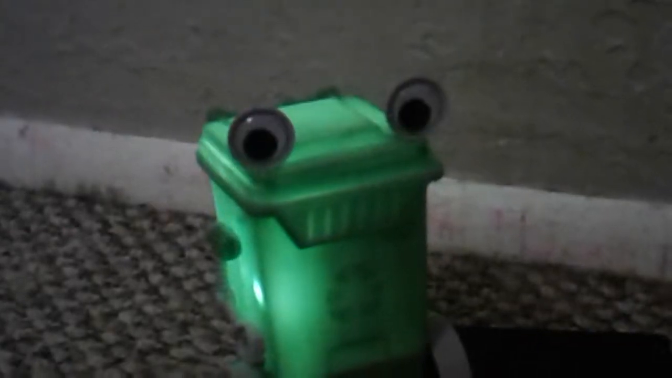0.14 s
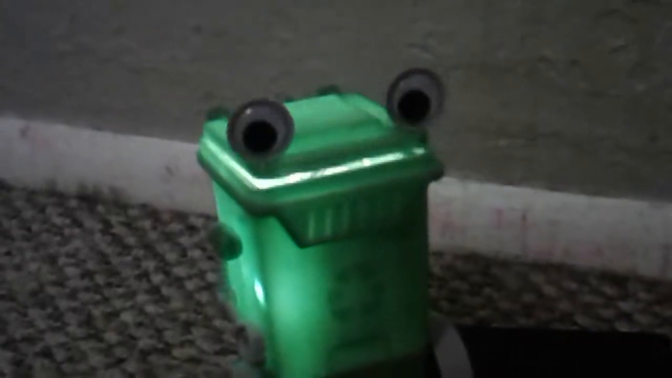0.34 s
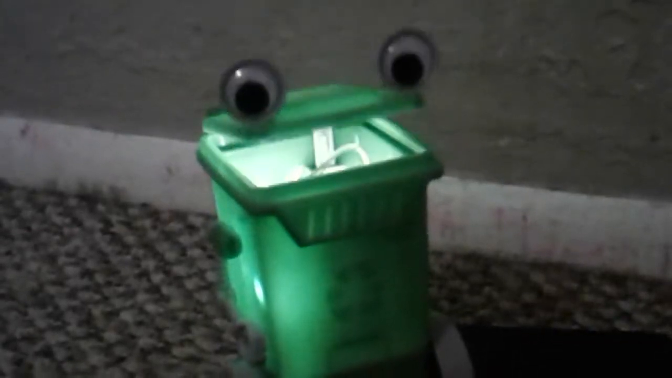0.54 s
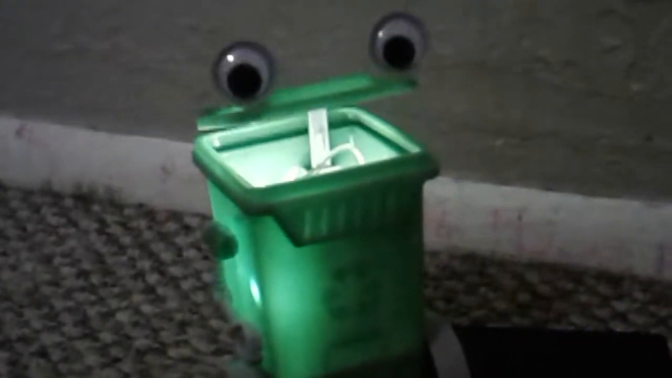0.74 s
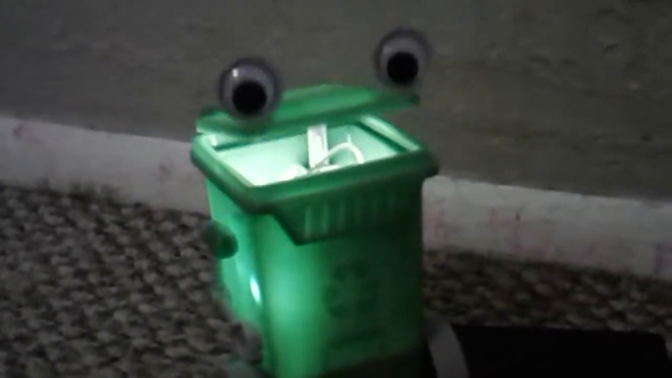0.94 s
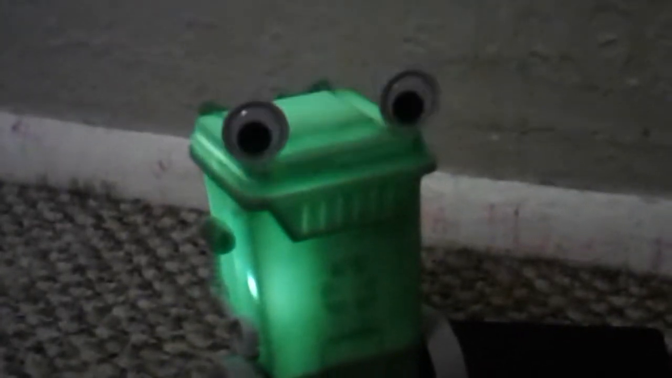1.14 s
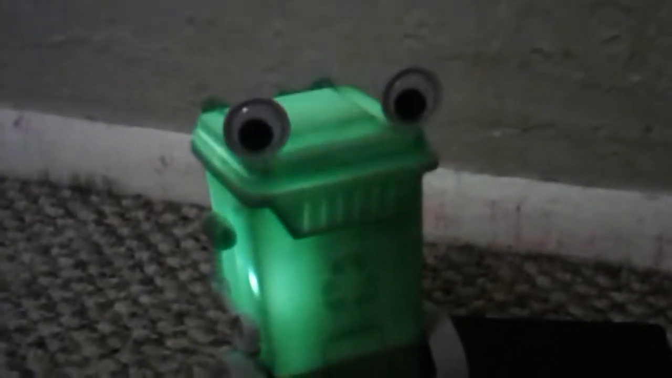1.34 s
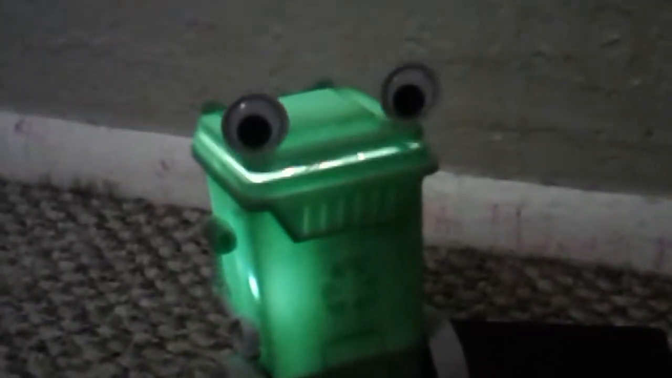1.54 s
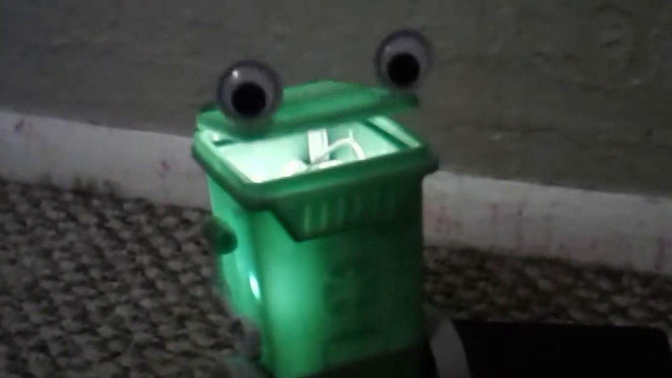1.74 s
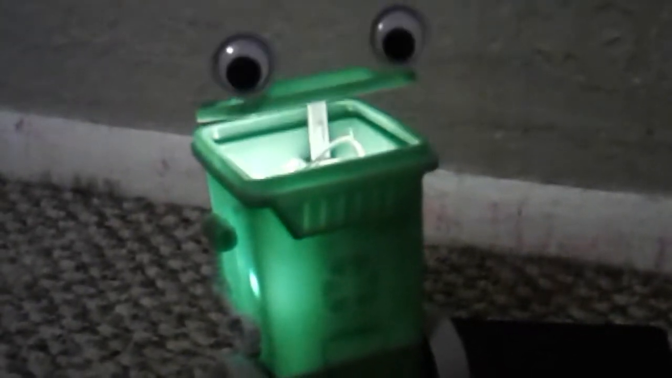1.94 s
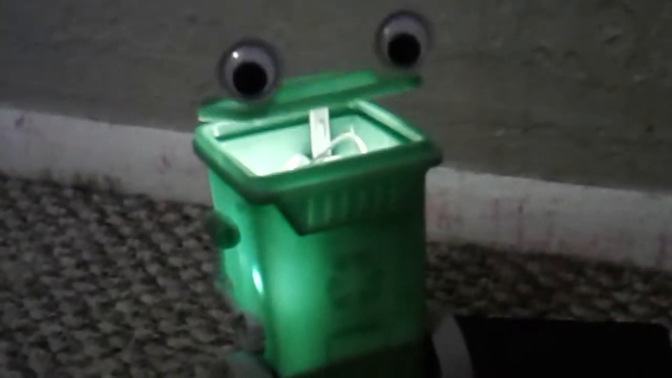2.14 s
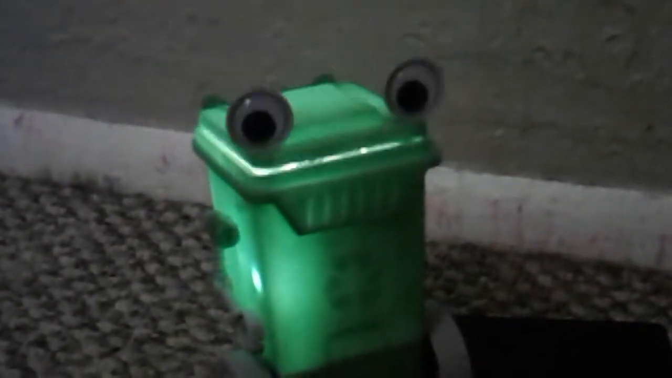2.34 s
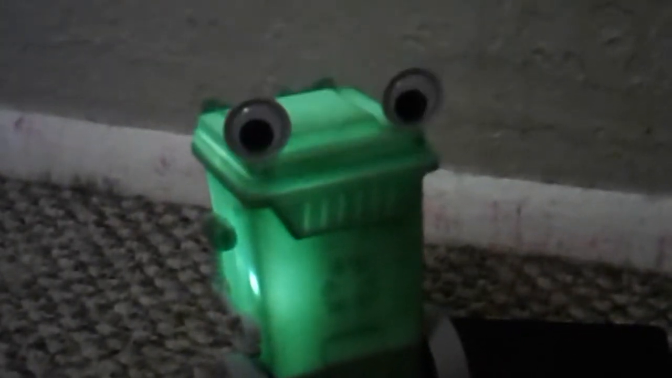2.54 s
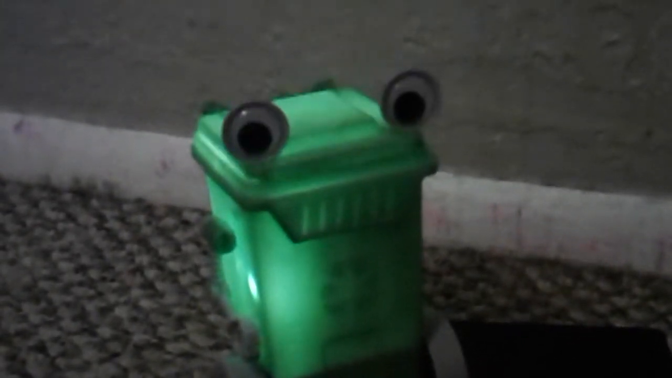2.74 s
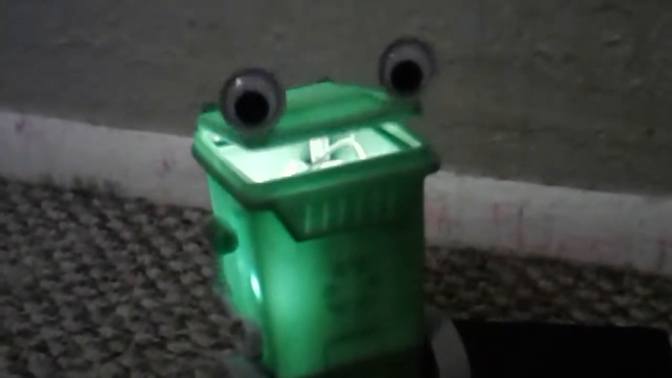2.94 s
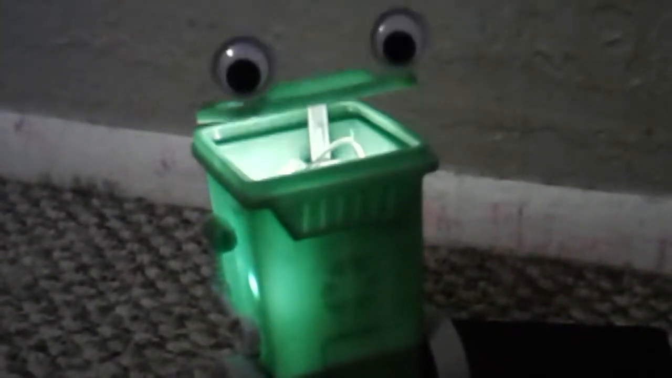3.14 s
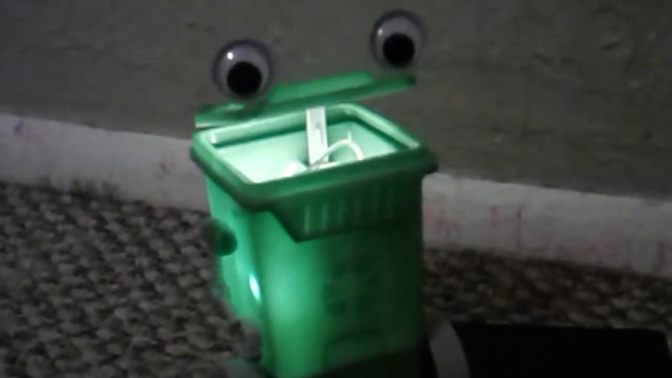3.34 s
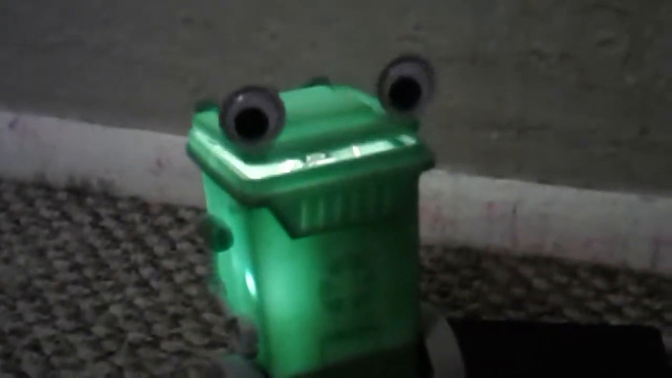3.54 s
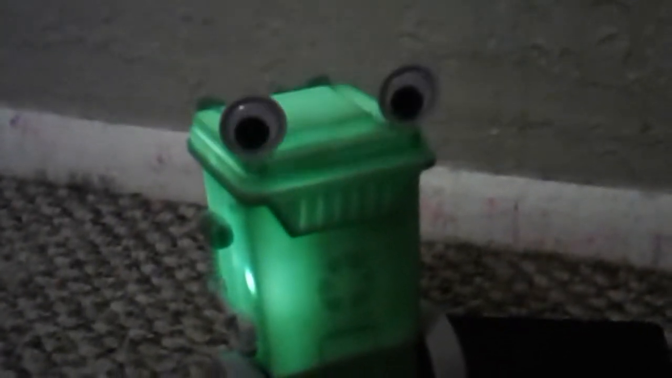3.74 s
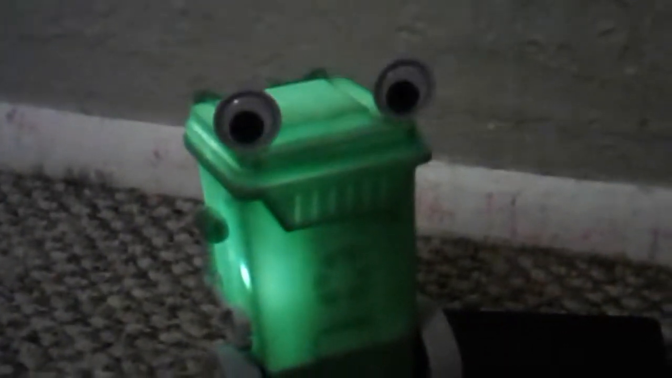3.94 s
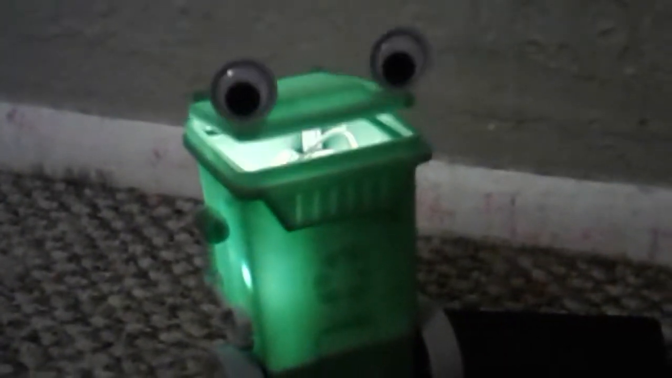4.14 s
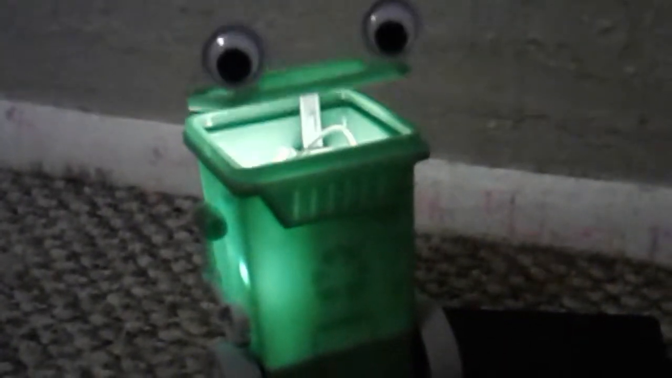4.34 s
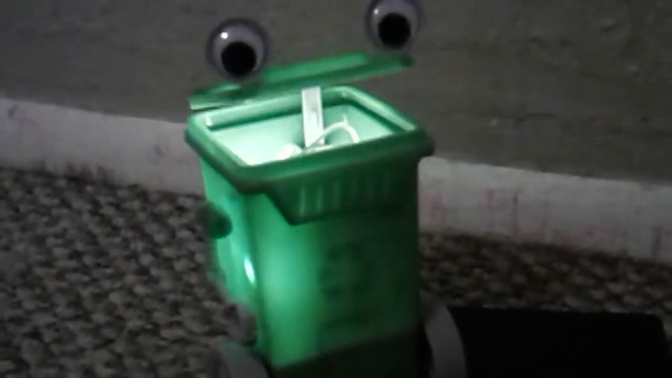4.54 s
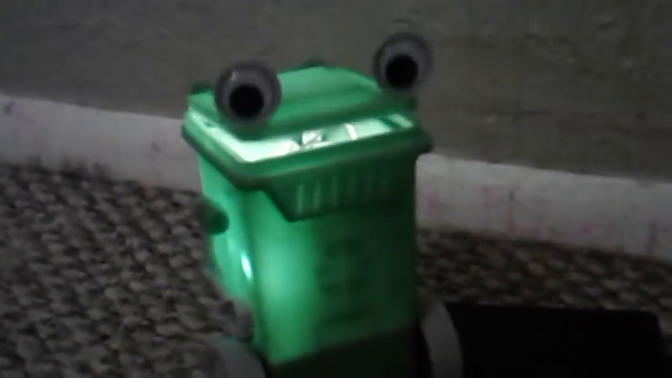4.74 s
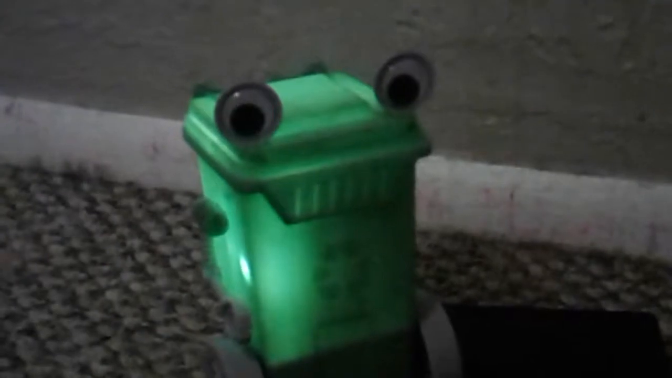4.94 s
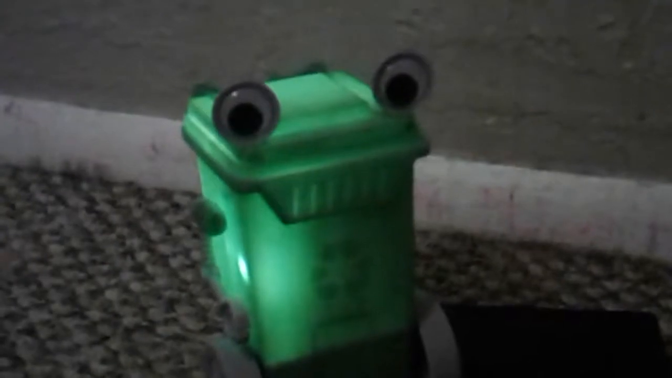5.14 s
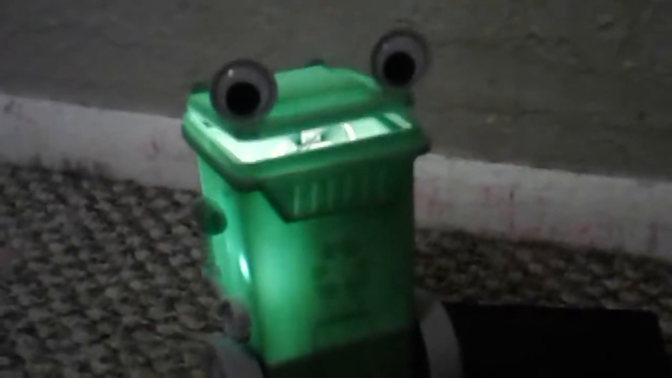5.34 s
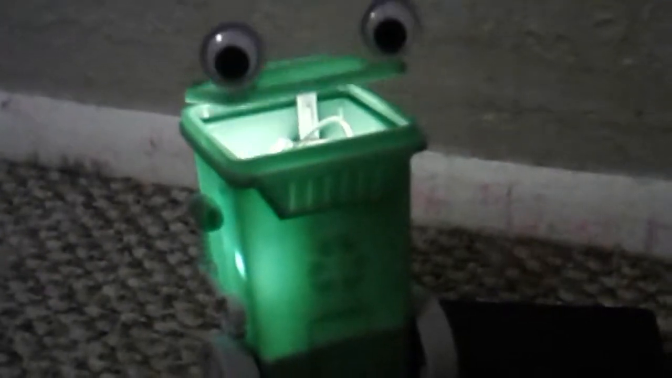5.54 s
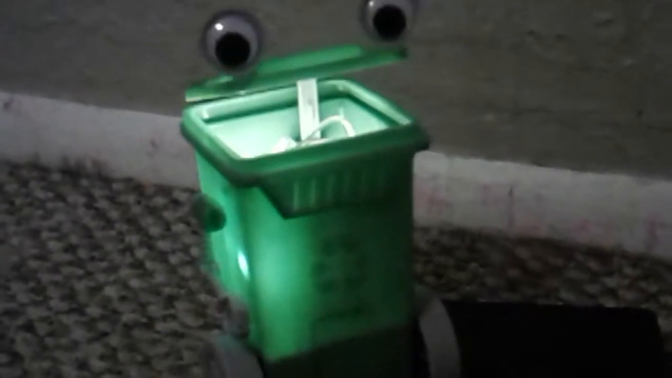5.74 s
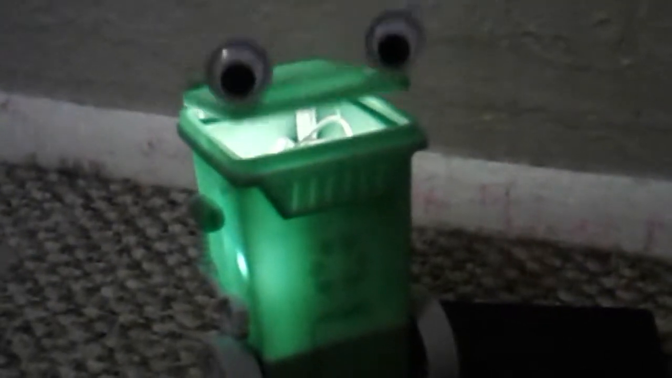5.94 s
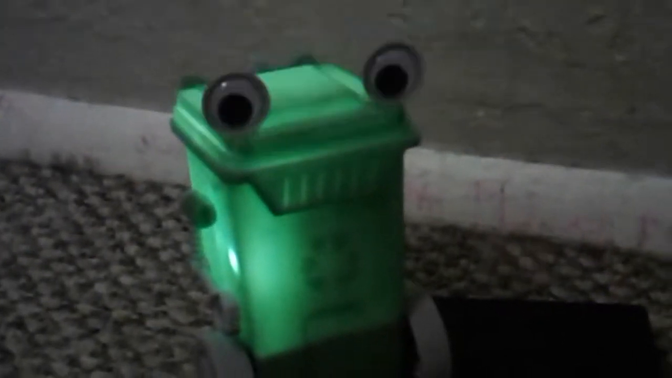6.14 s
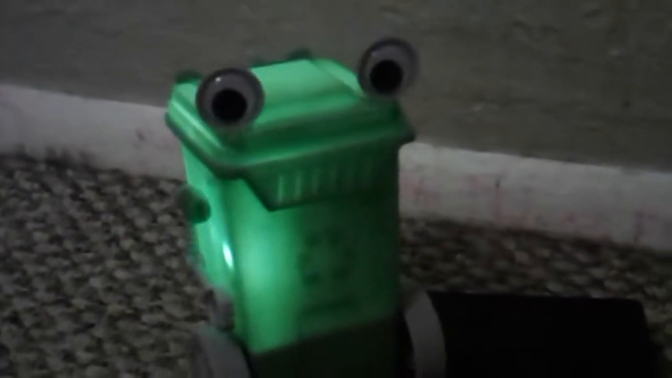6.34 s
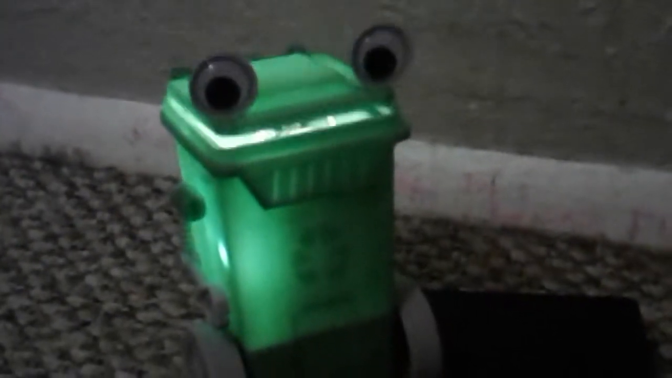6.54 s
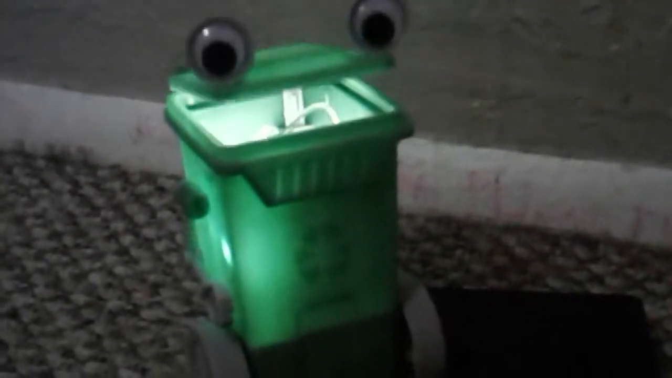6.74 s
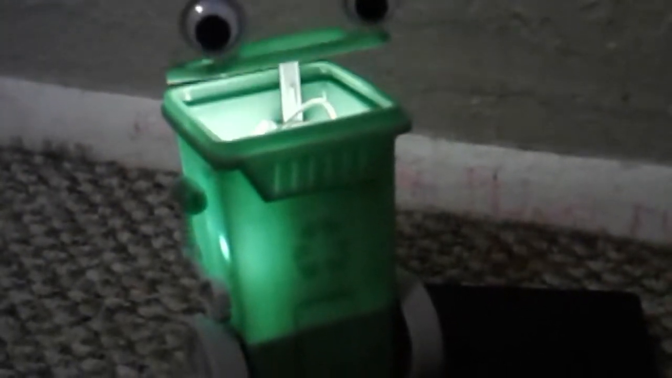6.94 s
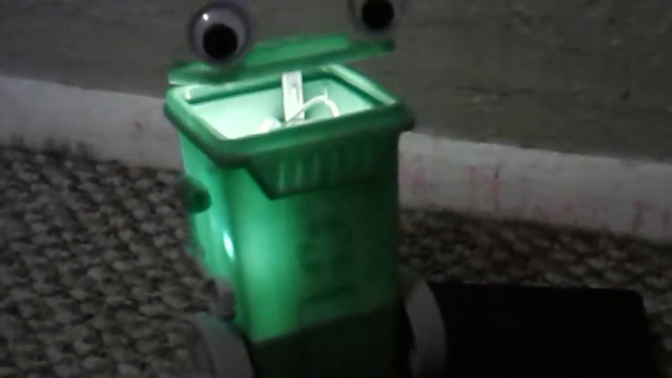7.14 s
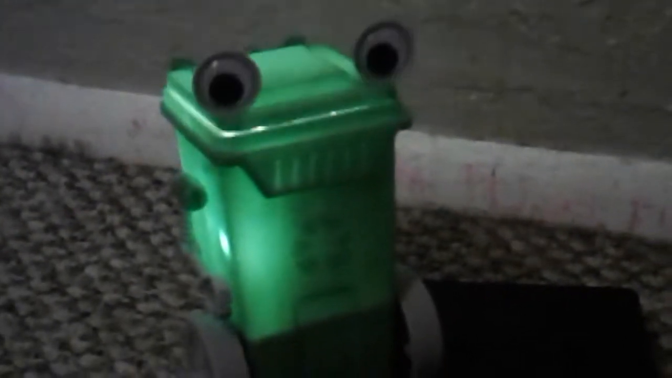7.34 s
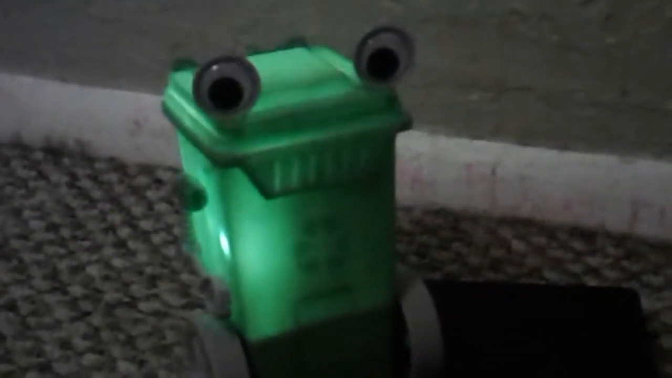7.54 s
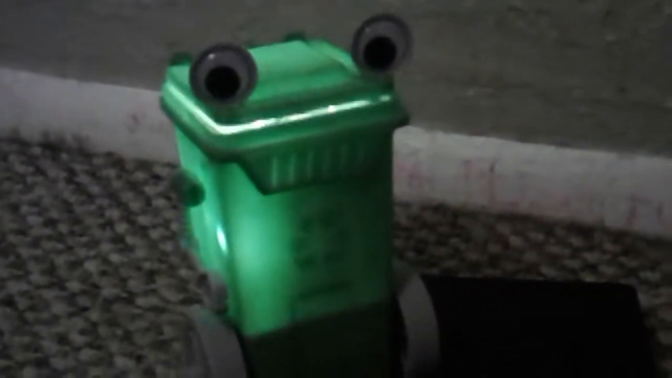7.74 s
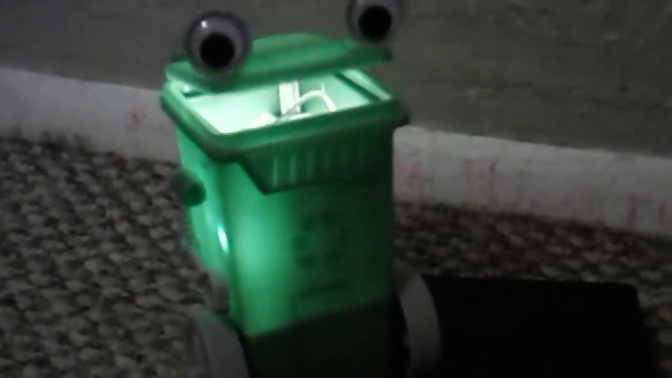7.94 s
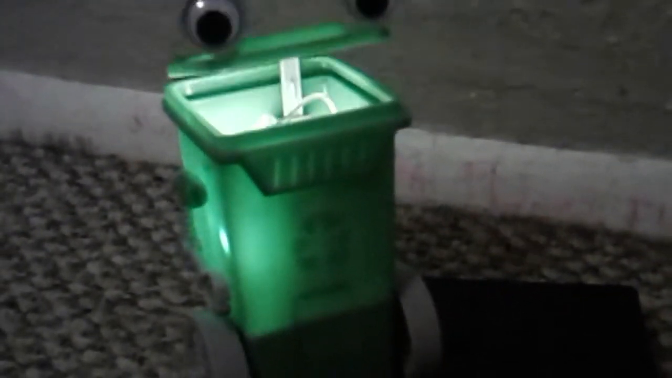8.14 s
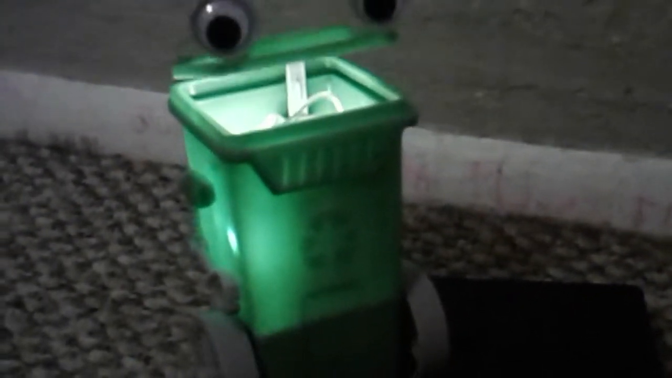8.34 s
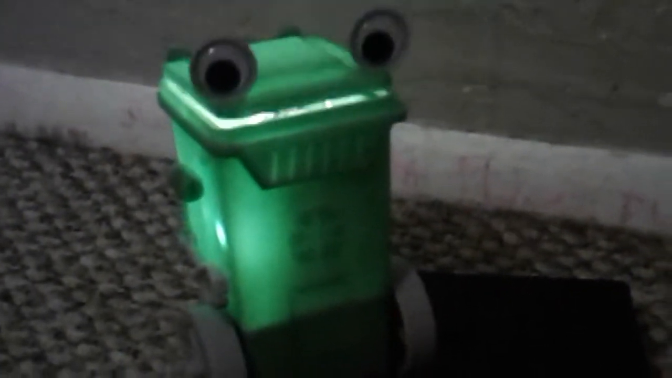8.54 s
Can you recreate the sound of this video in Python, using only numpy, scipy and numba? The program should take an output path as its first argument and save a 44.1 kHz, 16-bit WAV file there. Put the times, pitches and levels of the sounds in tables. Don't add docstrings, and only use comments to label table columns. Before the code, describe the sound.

Continuous grinding whir of small plastic gears, hollow and midrange, swelling under load with uneven knocks. Each cycle peaks in a hard linkage snap with quick bounces and loose rattle, then the lid buzzes down onto its rim and the motor eases. Seven snaps, the first muffled. Recorded close indoors on a limited microphone, over faint rumble and electronic whine; the gears grow brighter with time.

```python
import sys
import numpy as np
from scipy import signal
from scipy.fft import rfft, irfft
from scipy.io import wavfile
from scipy.ndimage import uniform_filter1d
from numba import njit

SR = 44100
rng = np.random.default_rng(int(sys.argv[2]) if len(sys.argv) > 2 else 0)


def output_pcm(signal):
    pcm = np.clip(np.atleast_2d(signal).T, -1, 1) * 32767
    wavfile.write(sys.argv[1], SR, np.round(pcm).astype(np.int16))


def boost_factor(decibels):
    exponent = np.asarray(decibels, float) / 20
    return 10 ** exponent


N = 379260
GRID_HZ = np.maximum(np.arange(4097) * SR / 8192, 1)


def level(x, db):
    return x * boost_factor(db) / np.sqrt(np.mean(x ** 2))


def curve(table):
    s, *columns = np.transpose(table)
    return [np.interp(np.arange(N) / SR, s, column) for column in columns]


def on_cam(after_s):
    snap_s, slip_s = np.array(SNAPS).T[:, :, None]
    return snap_s + after_s + slip_s * (after_s < -.01)


def each_cycle(table):
    after_s, *columns = np.transpose(table)
    times = on_cam(after_s).ravel()
    return curve(np.transpose([times, *np.tile(columns, len(SNAPS))]))


def turned_db(s):
    start_db, turn_s = -20, 1.98
    return start_db * np.exp(-s / turn_s)


def walk(rate):
    k = int(SR / rate)
    steps = np.repeat(rng.standard_normal(N // k + 1), k)
    return 1.3 * uniform_filter1d(uniform_filter1d(steps, k), k)[:N]


def causal(x, log_gain):
    cepstrum = irfft(log_gain)
    cepstrum[1:4096] *= 2
    cepstrum[4097:] = 0
    response = irfft(np.exp(rfft(cepstrum)))[:4096]
    return signal.oaconvolve(x, response)[:len(x)]


def colour(x, points):
    hz, db = np.transpose(points)
    gain_db = np.interp(np.log(GRID_HZ), np.log(hz), db)
    return causal(x, np.log(boost_factor(gain_db)))


def ring(x, modes):
    power = 1e-12
    for hz, width, db in modes:
        off = (2 * (GRID_HZ - hz) / width) ** 2
        power = power + boost_factor(db) ** 2 / (1 + off) / (1 + off / 9)
    return causal(x, np.log(power) / 2)


@njit
def sweep(x, hz, width):
    y, band, low = np.empty(len(x)), 0., 0.
    for i in range(len(x)):
        g, k = np.tan(np.pi * hz[i] / SR), width / hz[i]
        v = (band + g * (x[i] - low)) / (1 + g * (g + k))
        band, low, y[i] = 2 * v - band, low + 2 * g * v, k * v
    return y


def blows(times, db, contact, modes):
    shape = ring(contact, modes)
    out = np.zeros(N + len(shape))
    gains = boost_factor(db) / np.max(np.abs(shape))
    for at, gain in zip((times * SR).astype(int), gains):
        out[at:at + len(shape)] += gain * shape
    return out[:N]


def teeth(turn, depth_db, scatter_db, flicker_db):
    teeth_hz = 2505
    hit = rng.random(N) < teeth_hz / SR
    size = rng.standard_normal(N) * boost_factor(scatter_db * rng.exponential(size=N))
    throb_db = depth_db * (np.cos(turn) + 0.9 * np.cos(2 * turn + 1.0)) + flicker_db * walk(25)
    return boost_factor(throb_db) * (hit * size + 0.21 * rng.standard_normal(N))


def high_teeth(turn, scatter_db):
    passes = np.diff(np.floor(turn / np.pi), prepend=0) > 0
    return passes * boost_factor(scatter_db * rng.standard_normal(N))


# (time from the snap [s], shell level [dB])
LOAD = [(-0.87, -48), (-.76, -47), (-0.74, -49), (-0.693, -51), (-0.48, -45), (-0.414, -41.5),
        (-.03, -41.5), (.345, -43.5), (0.39, -49)]
# (time from the snap [s], level [dB])
STRAIN = [(-.85, -57.5), (-0.69, -54.5), (-0.662, -62), (-0.38, -57), (-0.17, -53), (-.08, -44),
          (-0.66, -51.5), (0.186, -50.5), (0.29, -56)]
# (frequency [Hz], width [Hz], level [dB])
SHELL = [(798, 130, -13.5), (802, 95, -7), (884, 47, -5), (965.3, 49, 0.9), (1006, 40, -6.5),
         (1137, 262, -8)]
# (frequency [Hz], width [Hz], level [dB])
WALLS = [(1563, 42, -5.5), (1491, 68, -3.5), (1597, 18, 5), (1698, 360, -2.5), (1860, 80, -13),
         (1910, 24, -19.5), (2290, 46, -11)]


def slow_gears(turn):
    (shell_db,), (strain_db,) = each_cycle(LOAD), each_cycle(STRAIN)
    walls_db = -2.5 + .3 * (strain_db - strain_db.mean())
    rattle = level(teeth(turn, depth_db=1.72, scatter_db=1.0, flicker_db=-0.1), 0)
    slow = rattle + level(high_teeth(turn, scatter_db=4.5), -9.5)
    shell = level(ring(slow, SHELL), -0.44)
    walls = boost_factor(walls_db) * level(ring(slow, WALLS), -0.46)
    return boost_factor(shell_db) * (shell + walls)


# (time from the snap [s], gearbox level over the strain [dB])
ENGAGED = [
    (-.436, -3.5),
    (-.43, 2),
    (.36, 1),
    (.39, 0),
]
# (time from the snap [s], dip [Hz], gap resonance [Hz], its level [dB], pinion let through [dB])
OPENING = [(-.85, 2800, 5500, -3, -9), (-.436, 2370, 5700, -3, -17), (-.43, 2500, 5700, 5, -8.5),
           (-.33, 2600, 5600, 0, -11), (-0.5, 2500, 5800, 2, 2.5), (-.19, 2500, 5400, 3, -9.5),
           (-.06, 3300, 5200, -9, -11), (.13, 3100, 4900, -4, -12.5), (.3, 3300, 4700, 2, -10.5)]
# (frequency [Hz], width [Hz], level [dB])
LID = [(2560, 400, -8), (2880, 70, -8), (3027, 120, -6.5), (3380, 350, -6.5), (3760, 70, -2),
       (3920, 350, -5), (4206, 70, -2.5), (4290, 60, -1.5), (4400, 160, -7)]
# (frequency [Hz], width [Hz], level [dB])
GEARBOX = [(4750, 130, 1.5), (4930, 160, -1), (5070, 98, 5.5), (5280, 280, 0.5), (5480, 420, -8.5)]
# (frequency [Hz], width [Hz], level [dB])
PINION = [(6080, 120, -4.5), (6636, 200, 1), (6940, 250, -6)]
# (frequency [Hz], width [Hz], level [dB])
AIR = [(7820, 340, -3.3), (9240, 460, -8), (8500, 900, -18)]
LID_TURN = 0.094


def quick_gears(turn):
    t = np.arange(N) / SR
    (strain_db,), (engaged_db,) = each_cycle(STRAIN), each_cycle(ENGAGED)
    dip_hz, gap_hz, gap_db, through_db = each_cycle(OPENING)
    box_db = strain_db + engaged_db + turned_db(t)
    lid_db = (LID_TURN - 1) * turned_db(t) - engaged_db
    pinion_db = through_db - engaged_db + 1.32 * (t - 3.0)
    quick = teeth(turn, depth_db=1.55, scatter_db=-0.3, flicker_db=1.34)

    lid = ring(quick, LID)
    lid = boost_factor(lid_db) * level(lid - 0.82 * sweep(lid, dip_hz, 700.), -0.53)
    flank = -.3 + (1.1 - -.3) * np.exp(-t / 2.5)
    lid = lid + flank * sweep(lid, np.full(N, 2980.), 1100.)

    box = level(ring(quick, GEARBOX), -1.4)
    delayed = np.roll(quick, shift=573)
    gap = sweep(sweep(delayed, gap_hz, 730.0), gap_hz, 1200.)
    gap = boost_factor(gap_db) * level(gap, -3.5)
    pinion = boost_factor(pinion_db) * level(ring(quick, PINION), 1.5)
    air = level(ring(quick, AIR), -3.5)
    return boost_factor(box_db) * (lid + box + gap + pinion + air)


def gears():
    wheel_hz = 38.86 * (1 + .04 * walk(4.5))
    turn = 2 * np.pi * np.cumsum(wheel_hz) / SR
    idle = level(ring(rng.standard_normal(N), GEARBOX + PINION), -76.5)
    return slow_gears(turn) + quick_gears(turn) + idle


# (frequency [Hz], level per Hz [dB])
RUMBLE = [(13, -36.5), (22, -0.5), (27, -12.5), (57, -3), (70, 0), (155, -7), (247, 1.5), (285, -0.5),
          (330, -9.5), (440, -3.5), (547, -17), (670, -14.5), (700, -7), (910, -30), (1540, -120)]


def room():
    rumble = colour(rng.standard_normal(N), RUMBLE + [(1500, -50.0), (20000, -91.5)])
    return boost_factor(-48 + walk(10) / 2) * level(rumble, 0)


# (frequency [Hz], rms level [dB])
WHINE = [(10998, -114), (11509, -112), (12021, -113), (12150, -104), (12279, -111), (12532, -102),
         (12662, -90.5), (12791, -109), (13173, -112), (15730, -116)]


def whine():
    t = np.arange(N) / SR
    tones = sum(boost_factor(db) * np.sqrt(2) * np.sin(2 * np.pi * hz * t) for hz, db in WHINE)
    skirt = level(ring(rng.standard_normal(N), [(11960, 470, 0)]), -100)
    hiss = level(rng.standard_normal(N), -93)
    awake = np.clip((t - .03) / 0.088, .1, 1)
    return awake * (tones * boost_factor(.7 * walk(4) - 1.0) + skirt + hiss)


# (time from the snap [s], shell peak [dB], walls over it [dB])
RISING = [(-.627, -41, -5), (-.586, -39, -7), (-.548, -39, -7), (-.489, -35, -7), (-.439, -33, -10),
          (-.423, -33, -5), (-.392, -32, -7), (-.364, -29, -6), (-.333, -33, -6), (-.304, -30, -11),
          (-.289, -33, -10), (-.253, -31, -7), (-.227, -28, -7), (-.202, -28, -4), (-.185, -30, -8),
          (-.167, -33, -6), (-.12, -30, -3), (-.094, -30, -7), (-.084, -35, -2), (-.062, -35, -2),
          (-.047, -29, -7)]
# (time from the snap [s], shell peak [dB], walls over it [dB])
SINKING = [(-.004, -32, -14), (.035, -31, -4), (.101, -32, -6), (.127, -32, -4), (.148, -35, -6),
           (.164, -32, -5), (.2, -32, -9), (.233, -32, -10), (.256, -35, -3), (.294, -33, -8),
           (.348, -36, -2), (.49, -39, -7), (.565, -40, -5)]


def knocks():
    after_s, db, walls_db = np.transpose(RISING + SINKING)
    s = on_cam(after_s) - .0022
    db = db + 1 * rng.standard_normal(s.shape)
    heard = (s > 0) & (s < N / SR)
    s, db, walls_db = s[heard], db[heard], (db + walls_db)[heard]
    bump = np.r_[1., np.zeros(3000)]
    soft = ring(bump, [(941, 243, 0)])
    shell = blows(s, db - 1.0, soft, SHELL)
    walls = blows(s, walls_db - 5.5, bump, WALLS)
    box = blows(s, db - 17 + 0.42 * turned_db(s), bump, LID + GEARBOX)
    return shell + walls + box


# (time [s], how far the linkage slipped ahead of the gears [s])
SNAPS = [
    (.0308, 0),
    (1.259, 0),
    (2.4897, 0),
    (3.7239, 0),
    (4.9417, .023),
    (6.1883, 0),
    (7.442, 0),
    (8.696, 0),
]
# (time after the snap [s], level [dB])
BOUNCES = [
    (0.014, -9.5),
    (0.038, -17.5),
]
# (frequency [Hz], width [Hz], level [dB])
ARM = [(1388, 37, -6), (1665, 170, -0.5), (1966, 42, -2.5), (2108, 37, -7), (2270, 96, -2.5),
       (2915, 99, -7.5), (3836, 240, -7.5), (3780, 12, -12.5), (4410, 22, -6)]


def snaps():
    crack_s, crack_rise_s, crack_lead_s = .0035, .0015, .0027
    rattle_t60_s, rattle_db = 0.26, -6
    s = np.array(SNAPS)[:-1, 0]
    db = np.full(len(s), -24.)
    db[0] += -5.5
    box_db = -6 + 1.24 * turned_db(s)

    t = np.arange(14000) / SR
    push = np.exp(-t / crack_s) + boost_factor(rattle_db) * np.exp(-t * np.log(1000) / rattle_t60_s)
    for after_s, bounce_db in BOUNCES:
        push = push + boost_factor(bounce_db) * (t > after_s) * np.exp(-np.abs(t - after_s) / crack_s)
    contact = push * (1 - np.exp(-t / crack_rise_s)) * rng.standard_normal(len(t))
    bright = contact * np.exp(-t / 0.011)

    zones = ((SHELL + [(497, 400, -12)], -1.5), (WALLS, -6.0), (ARM, 1.5), (LID, -8.0))
    top = ((GEARBOX, box_db + 3.0), (PINION, box_db - 10.0), (AIR, box_db + 1.0))
    start_s = s - crack_lead_s
    body = sum(blows(start_s, db + zone_db, contact, modes) for modes, zone_db in zones)
    treble = sum(blows(start_s, db + zone_db, bright, modes) for modes, zone_db in top)
    return body + treble


# (time from the snap [s], level [dB])
SEATING = [
    (.27, -70.5),
    (.315, -46.5),
    (.365, -44.5),
    (.385, -70.5),
]


def landing():
    chatter = teeth(0, depth_db=0, scatter_db=.8, flicker_db=1.2)
    rim = ring(chatter, [(1610, 1000, 4), (2950, 1700, -13), (3900, 960, -1.0), (5200, 470, -21.5)])
    (seating_db,) = each_cycle(SEATING)
    return boost_factor(0.33 * turned_db(np.arange(N) / SR) + seating_db) * level(rim, 0)


# (time [s], level [dB])
TICKS = [
    (3.7245, -66),
    (4.8954, -53),
    (6.1894, -64),
    (7.4426, -58),
    (7.7175, -61),
]


def electrical_ticks():
    clicks = np.zeros(N)
    for at_s, db in TICKS:
        clicks[int(at_s * SR)] += boost_factor(db)
    return clicks


def scene():
    return (gears() + room() + knocks() + snaps() + landing())[None]


# (frequency [Hz], level [dB])
MIC = [(20, -15), (45, 0), (6000, 0.5), (6900, -5.5), (7300, -16), (7600, -26.5), (8600, -29),
       (10000, -27.5), (20000, -59)]


def microphone(sound):
    t = np.arange(N) / SR
    wake_db = -19.5 * np.exp(-t / 0.15) - 15 * (t < .027)
    ceiling = .25
    return colour(boost_factor(wake_db) * ceiling * np.tanh(sound / ceiling), MIC)


def band_limit(x):
    return signal.sosfilt(signal.butter(12, 15750, fs=SR, output="sos"), x)


def record(dry):
    mix = microphone(dry[0]) + electrical_ticks() + whine()
    return band_limit(mix[None])


dry = scene()
out = record(dry)
output_pcm(out)
```